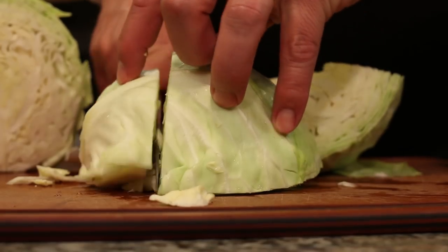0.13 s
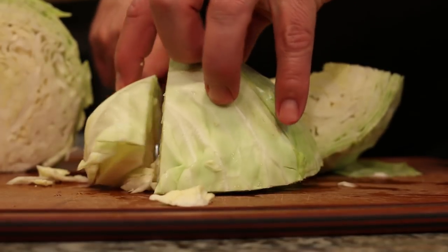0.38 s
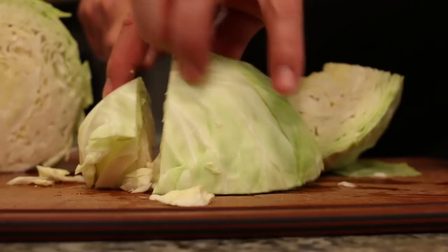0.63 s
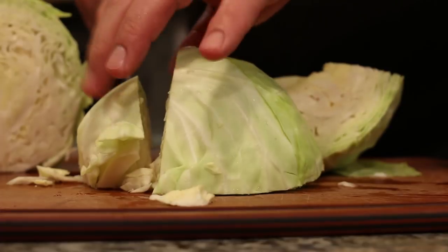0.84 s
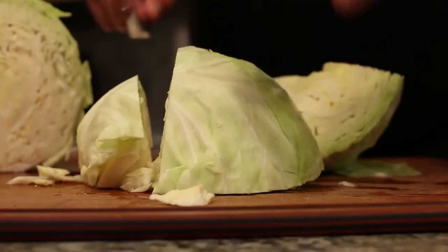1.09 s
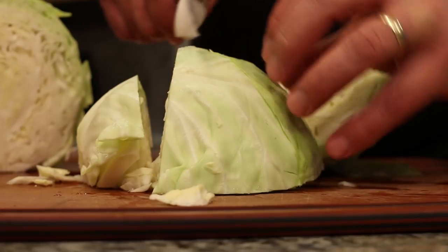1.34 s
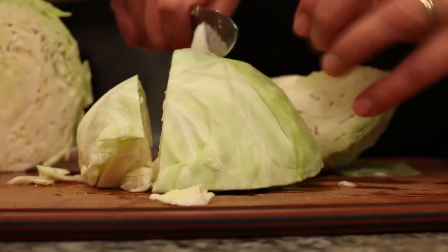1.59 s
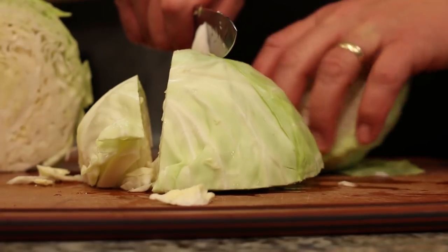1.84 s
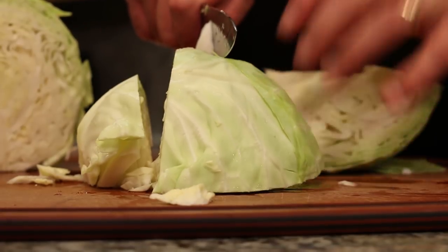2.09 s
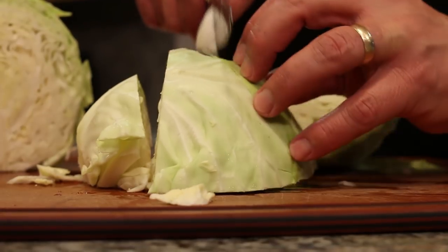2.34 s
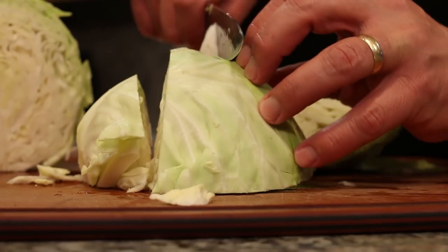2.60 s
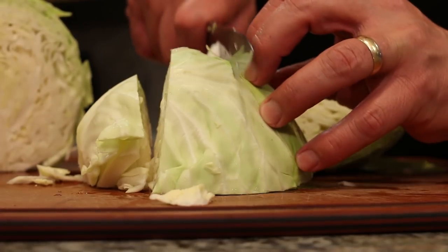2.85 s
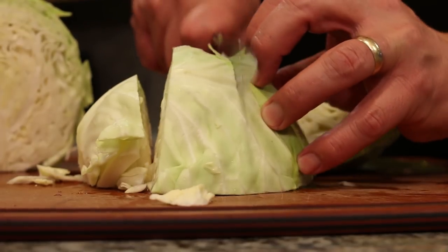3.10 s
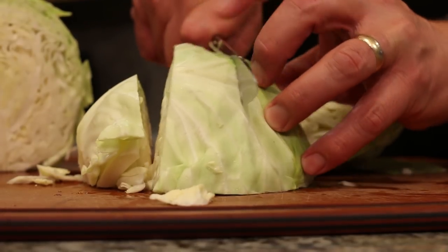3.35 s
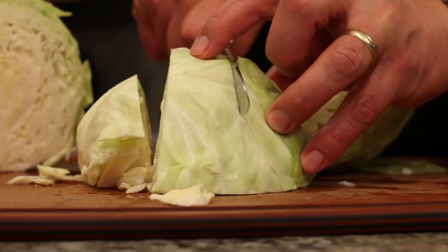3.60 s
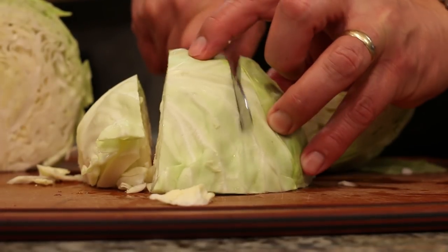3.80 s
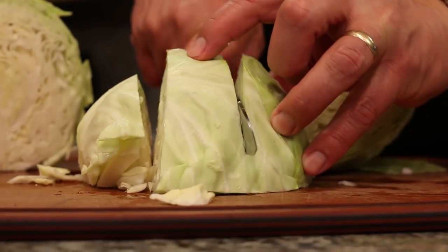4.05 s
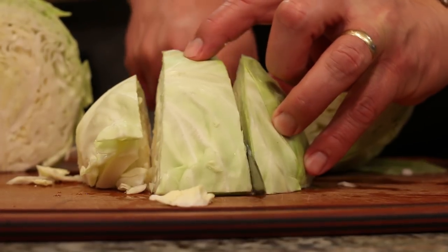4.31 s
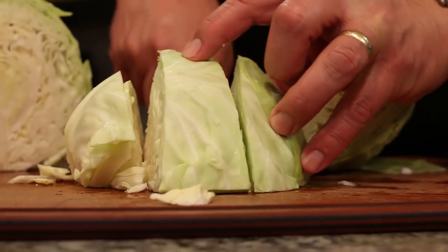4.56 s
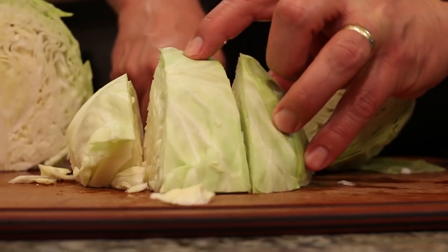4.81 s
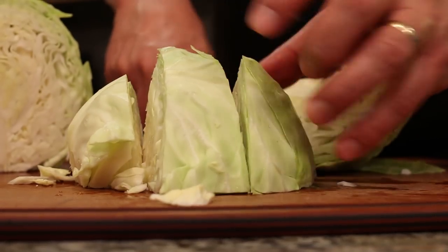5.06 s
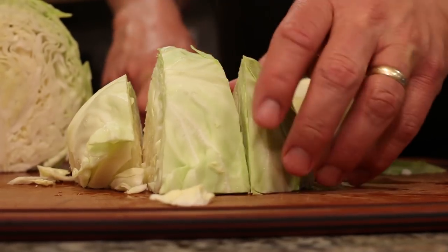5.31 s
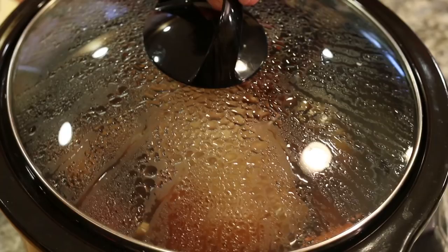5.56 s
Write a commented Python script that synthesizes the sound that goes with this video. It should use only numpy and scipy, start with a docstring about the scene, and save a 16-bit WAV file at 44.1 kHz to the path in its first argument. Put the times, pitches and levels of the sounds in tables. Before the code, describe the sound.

Close-up cabbage cutting: sparse ticks, crunchy tearing fibres, one hard woody blade knock, small snaps, a brief scrape and a soft wedge thud.

```python
"""Knife through a raw cabbage on a wooden board, close by: shaped noise grains crackle as fibres part,
band-passed ticks and short modes are ribs snapping and knocks of the handling hand; board modes ring
under the blade, then a wedge drops. The blade edge drags once along the board.
Sparse decaying echoes make the kitchen; wavering sine lines are refrigerator hum,
coloured noise is air and microphone hiss."""
import sys
import numpy as np
from scipy import signal
from scipy.fft import rfft, irfft
from scipy.io import wavfile
from scipy.ndimage import uniform_filter1d

SR = 44100
rng = np.random.default_rng(int(sys.argv[2]) if len(sys.argv) > 2 else 0)


def wrap_up_sound(samples):
    """Save the sound to the file named by the first command line argument, as 16-bit audio."""
    columns = np.atleast_2d(samples).T
    # keep every value between -1 and 1, then stretch to whole-number steps
    tamed = np.clip(columns, -1, 1)
    steps = np.round(tamed * 32767).astype(np.int16)
    wavfile.write(sys.argv[1], SR, steps)


def ratio(d):
    """dB to gain"""
    e = np.asarray(d, float) / 20
    return 10 ** e


N = 250311
LEAD_S = 1  # run-in, so that sounds begun before t = 0 still ring

# Blade on board: t/s, board ring peak/dB, last ribs' crack/dB, contact brightness/(dB/octave)
CHOPS = [(-.03, -17, -12.5, 1.5), (4.3109, -0.3, -10, 0.0)]
# Board modes: f/Hz, relative level/dB, decay scale/s (see ring)
BOARD_MODES = [(330, -19, .04), (630, -26, .03), (820, -3, 0.022), (1140, -4.5, 0.015), (1480, -15, 0.018),
               (1790, -3, 0.013), (1905, 0.5, 0.014), (2080, -3, .013), (2322, -2.5, 0.013),
               (2670, -6, 0.018), (3130, -21, 0.04), (4140, -16.5, 0.016), (4315, -23.5, 0.023),
               (4960, -13, 0.013), (5400, -19, 0.023), (6400, -20, 0.0054), (7110, -17, 0.0075)]
# Modes of the counter under the board: f/Hz, relative level/dB, decay scale/s
WORKTOP_MODES = [(45, 2, 0.07), (85, -7, 0.082)]
# Spectrum of the last ribs cracking: f/Hz, relative density/dB
CRACK_SPECTRUM = [(88, -46), (150, -27), (404, -14), (695, -9), (812, -7), (1550, -5), (2300, -1.5),
                  (3500, -15), (4800, -11), (7500, -24), (15500, -44)]

# Echoes of the kitchen: f/Hz, t60/s, relative level reaching the walls/dB
KITCHEN = [(250, 0.61, 0), (450, .45, 0), (806, 0.4, -5), (1100, .45, -5), (1450, 0.45, -10),
           (1850, .5, -3), (2500, 0.48, -1), (3660, 0.59, -4.5), (5160, 0.45, -1), (7200, 0.21, -2),
           (12000, 0.23, 5)]
# Air and microphone noise: f/Hz, relative density/dB
AIR_SPECTRUM = [(20, -17.5), (90, -11.5), (180, -7), (385, -12.5), (540, -12.5), (860, -16.5), (1200, -21),
                (2100, -22.5), (3000, -27), (6000, -30), (12000, -27.5), (15700, -30.5)]
AIR_DB, DRIFT_DB, DRIFT_S = -53, 0.7, 0.15  # level, rms level wander, its smoothing window
# Motor hum lines: f/Hz, rms level/dB, line width/Hz
HUM = [(60, -77, 2.3), (121, -61.5, 3.3), (223.5, -68.5, 10.6), (387.3, -65, 10.6), (1165, -70, 11.8)]
# Capsule hiss, opposite in the two channels: f/Hz, relative density/dB
SIDE_HISS_SPECTRUM = [(12, -30), (20, -6), (187, -10.5), (241, -10.5), (388, -12), (558, -11), (897, -15.5),
                      (16000, -13.5)]
SIDE_HISS_DB = -61

# Pushes of blade or hand: t/s, build-up/s, let-go/s, fibre crackle/dB, body squeeze/dB
PUSHES = [ (0.0, .003, .12, -70, -52), (0.05, .02, .22, -64, -55), (0.6, 0.016, 0.15, -62.5, -60),
          (1.803, 0.0088, 0.04, -54, -54), (2.765, 0.056, .11, -48, -61.5),
          (2.92, 0.023, 0.074, -54.5, -49.5), (3.02, 0.014, 0.039, -51, -57),
          (3.134, 0.04, .11, -48, -49.5), (3.25, .06, .1, -56, -59), (3.38, .06, .2, -55, -60),
          (3.625, 0.034, .1, -54, -61), (3.825, .025, 0.1, -47.5, -52), (4.015, .03, .12, -51, -50),
          (4.169, .04, 0.027, -56.5, -51.5), (4.235, 0.022, 0.033, -46, -47),
          (4.274, .03, 0.0052, -38, -42), (4.312, .01, .16, -49, -52), (4.47, .03, 0.094, -45, -53),
          (4.635, 0.04, 0.03, -48, -52), (4.685, .018, .014, -41, -52), (4.78, 0.073, .08, -55.5, -61)]
BUILD_DB, LET_GO_DB = 9.5, 8.5  # swell to the peak, fade before the stop
JERK_DB, JERK_S = 2.8, 0.0086  # uneven advance: rms, smoothing window
# Density of the cabbage touched: t/s, share (loose leaves 0, heart 1)
DENSITY = [(1.9, 0.8), (2.76, 0.045), (3.3, 0.4), (3.85, 0.84), (4.6, 0.96), (4.68, 0.45)]
# Loose outer leaves: f/Hz, relative density/dB
LEAF_SPECTRUM = [(1500, -42), (2500, -27), (3500, -21), (5000, -10), (8000, -1.5), (11200, 2.5),
                 (13500, -8), (15700, -13)]
# Dense wet heart: f/Hz, relative density/dB
HEART_SPECTRUM = [(1500, -26), (2500, -7.5), (3500, -15), (4800, -5.5), (7500, -12), (10800, -2.5),
                  (15700, -9.5)]
# Squeezed cabbage body: f/Hz, relative density/dB
BODY_SPECTRUM = [(180, -36), (300, -11), (362, -2.5), (636, -16), (778, 0.5), (1150, 0), (1470, -0.5),
                 (1780, -2), (6000, -12), (7800, -29), (13200, -120)]

# Ribs snapping and knocks of the handling hand: t/s, tick peak/dB, knock peak/dB, tick f/Hz
SNAPS = [(0.0658, -37.5, -54, 7400), (0.1148, -43, -48, 6800), (0.204, -42, -58, 5500),
         (0.254, -46, -58, 6000), (0.6244, -40, -48, 6460), (0.6808, -41, -52, 7200),
         (0.6954, -40, -56, 8000), (0.7178, -42, -56, 9600), (0.944, -37, -37, 8600),
         (1.2624, -34, -48, 7800), (1.7685, -43, -56, 6000), (1.7725, -37, -46, 9000),
         (1.8124, -32.5, -33, 8000), (1.8155, -35, -40, 12500), (1.8235, -40, -50, 12500),
         (1.842, -39, -48, 8500), (1.857, -50, -44, 6000), (1.886, -43, -58, 10500),
         (1.8932, -42, -37, 7600), (2.187, -48, -43, 7000), (2.237, -50, -44, 7000), (2.28, -43, -48, 7500),
         (2.345, -44, -58, 10500), (2.354, -41, -52, 12000), (2.7199, -33, -62, 10900),
         (2.773, -28, -62, 11200), (2.78, -36, -60, 11000), (2.7955, -33, -56, 11000),
         (2.799, -24.5, -46, 11200), (2.8243, -29, -41, 9700), (2.8278, -30, -48, 11000),
         (2.8435, -32, -46, 8500), (2.8645, -34, -44, 10300), (2.8857, -29, -44, 10100),
         (2.9003, -28, -39, 10200), (2.9451, -34, -40, 7800), (2.963, -33, -45, 8800),
         (2.9758, -33, -37.5, 8600), (3.008, -38, -52, 8000), (3.0185, -40, -56, 12500),
         (3.0343, -33, -46, 9000), (3.057, -40, -54, 9500), (3.12, -42, -60, 11000),
         (3.1436, -27, -55, 9900), (3.1476, -27, -43, 9600), (3.1728, -18.5, -26.5, 9800),
         (3.1977, -27, -36, 10700), (3.2147, -46, -35, 8700), (3.226, -34, -44, 7000),
         (3.2371, -33, -42, 8200), (3.2778, -39, -54, 9700), (3.308, -40, -56, 11000),
         (3.323, -39, -58, 10700), (3.3312, -34, -53, 11500), (3.3478, -34.5, -52, 9000),
         (3.4345, -38, -46, 8400), (3.488, -40, -56, 10000), (3.551, -34, -41, 10700),
         (3.6012, -39, -40, 10000), (3.6576, -32.5, -50, 11000), (3.669, -33, -46, 11500),
         (3.695, -39, -56, 11000), (3.7186, -36, -57, 12400), (3.748, -39, -56, 10500),
         (3.759, -41, -54, 8000), (3.8425, -34, -44.5, 10200), (3.8773, -36, -40, 11100),
         (3.9263, -35, -34, 7800), (3.9364, -34, -49, 8100), (4.036, -30, -46, 12600),
         (4.1423, -46, -37.5, 6000), (4.2117, -40, -32, 6200), (4.237, -39, -43, 6900),
         (4.2951, -27, -28, 6400), (4.4787, -35, -47, 9900), (4.5332, -28.5, -29, 6500),
         (4.5754, -32, -34.5, 9100), (4.6608, -32, -38, 8800), (4.6788, -28, -31.5, 12000),
         (4.696, -22, -48, 11200), (4.703, -25.5, -36, 12300), (4.7081, -30, -33.5, 12000),
         (4.872, -42, -50, 10600)]
# Modes of the cabbage head: f/Hz, relative level/dB, decay scale/s
HEAD_MODES = [(450, -13, 0.023), (710, -1, 0.025), (1140, -2.5, 0.021), (2030, 0, 0.0084),
              (3220, 0, 0.0063)]
SMALL_PER_S, SMALL_HZ = 52, 10500  # smaller ribs: rate, mean tick pitch
SMALL_DB, SMALL_SPREAD_DB = 6.5, 2.5  # mean tick level over the crackle gain, spread
SMALL_KNOCK_DB = -15  # mean knock level relative to the tick

# Edge drawn along the board: t/s, build-up/s, let-go/s, level/dB
DRAG = (4.78, .05, .11, -51.5)
# Wedge falling: t/s, thud peak/dB, board ring peak/dB, wet leaf slap/dB
WEDGE_DROP = (5.6588, -18, -21, -33)
# Wedge modes: f/Hz, relative level/dB, decay scale/s
WEDGE_MODES = [(225, 0, 0.052), (290, 1, 0.045), (468, -6, 0.04), (610, -14, .03), (760, -10, .04)]
EDGE_HZ = 15900  # upper band limit


def evened(x):
    """Scales to rms 1."""
    return x / np.sqrt(np.mean(x ** 2) + 1e-20)


def coloured(x, spectrum):
    """Shapes x by a (Hz, dB) table, interpolated over log frequency, to rms 1."""
    f_hz, db = np.transpose(spectrum)
    hz = np.fft.rfftfreq(len(x), 1 / SR)
    gain = ratio(np.interp(np.log(hz + 1), np.log(f_hz + 1), db))
    return evened(irfft(rfft(x) * gain, len(x)))


def tilted(rows, slope_db):
    """Tilts a (Hz, dB, ..) table by slope_db per octave about 1 kHz."""
    return [(row[0], row[1] + slope_db * np.log2(row[0] / 1000), *row[2:]) for row in rows]


def wavering(rms_db, window_s):
    """Gain wandering as twice-smoothed noise."""
    width = round(window_s * SR)
    slow = uniform_filter1d(uniform_filter1d(rng.standard_normal(N), width), width)
    return ratio(rms_db * evened(slow))


def add(mix, s, sound):
    """Mixes sound in at s seconds, which may be negative."""
    at = round(s * SR)
    sound = sound[max(-at, 0):]
    part = mix[..., max(at, 0):][..., :sound.shape[-1]]
    part += sound[:part.shape[-1]]


def ring(modes, contact_s, detune=1, damping=0.73, low_hz=150):
    """Modes losing 60 * damping dB per decay scale, short contact onset, little bass; peak 1."""
    t = np.arange(SR // 10) / SR
    x = np.zeros(len(t))
    for hz, db, decay_s in modes:
        x += ratio(db - 60 * damping * t / decay_s) * np.sin(2 * np.pi * hz * detune * t)
    b, a = signal.butter(2, low_hz, "high", fs=SR)
    x = signal.lfilter(b, a, x * (1 - np.exp(-t / contact_s)))
    return x / abs(x).max()


def puff(spectrum, decay_s):
    """Coloured noise burst with exponential decay."""
    t = np.arange(SR // 10) / SR
    return coloured(rng.standard_normal(len(t)), spectrum) * np.exp(-t / decay_s)


def grains(per_s, spread_db, fill):
    """Sparse clicks, a few large, fraying into noise over a continuous rustle."""
    hit, size = rng.random(N), rng.exponential(1, N)
    fray, rustle = rng.standard_normal(N), rng.standard_normal(N)
    clicks = (hit < per_s / SR) * ratio(spread_db * np.minimum(size, 4))
    envelope = signal.lfilter([1], [1, -0.96], clicks)
    return evened(envelope * fray) + fill * rustle


def stroke(rise_s, fall_s):
    """Gain of one movement: swells to its peak, fades, stops; ends ramped."""
    t = np.arange(0, rise_s + fall_s, 1 / SR)
    db = np.interp(t, [0, rise_s, rise_s + fall_s], [-BUILD_DB, 0, -LET_GO_DB])
    ends = np.clip(np.minimum(t, rise_s + fall_s - t) / 0.0028, 0, 1)
    return ends * ratio(db)


def density(t):
    """Density of the cabbage touched: loose leaves 0, heart 1."""
    s, share = np.transpose(DENSITY)
    return np.clip(np.interp(t, s, share), 0, 1)


def effort():
    """Gains of fibre crackle and body squeeze over time."""
    fibre, body = np.zeros(N), np.zeros(N)
    for s, rise_s, fall_s, fibre_db, body_db in PUSHES:
        movement = stroke(rise_s, fall_s)
        add(fibre, s, ratio(fibre_db) * movement)
        add(body, s, ratio(body_db) * movement)
    return fibre, body


def chops():
    """Blade impact excites board and counter modes; the last ribs crack as a noise burst."""
    out = np.zeros(N + LEAD_S * SR)
    for s, board_db, crack_db, slope_db in CHOPS:
        at_s = s + LEAD_S
        add(out, at_s, -ratio(board_db) * ring(tilted(BOARD_MODES, slope_db), 0.00024, low_hz=600))
        add(out, at_s, ratio(board_db - 48) * ring(WORKTOP_MODES, 0.0026, low_hz=22.1))
        add(out, at_s, ratio(crack_db) * puff(tilted(CRACK_SPECTRUM, slope_db), 0.0032))
    return out


def kitchen(x):
    """Sparse random-sign echoes, each band dying at its own rate."""
    taps = np.zeros(SR)
    at = np.arange(400, SR - 20, 20)
    taps[at + rng.integers(0, 20, len(at))] = rng.choice([-1., 1.], len(at))
    hz, t, z = signal.stft(taps, SR, nperseg=256)
    f_hz, t60_s, db = np.transpose(KITCHEN)
    start_db = np.interp(hz, f_hz, db)[:, None]
    fall_db = 60 * t / np.interp(hz, f_hz, t60_s)[:, None]
    tail = signal.istft(z * ratio(start_db - fall_db), SR, nperseg=256)[1]
    return signal.fftconvolve(x, tail / np.linalg.norm(tail))[:len(x)]


def room_tone():
    """Level-drifting air and microphone noise; motor hum lines broadened by phase random walk."""
    t = np.arange(N) / SR
    out = ratio(AIR_DB) * coloured(rng.standard_normal(N), AIR_SPECTRUM)
    out *= wavering(DRIFT_DB, DRIFT_S)
    for hz, db, width_hz in HUM:
        wander = np.cumsum(rng.standard_normal(N)) * np.sqrt(2 * np.pi * abs(width_hz) / SR)
        out += ratio(db) * np.sqrt(2) * np.sin(2 * np.pi * hz * t + wander)
    return out


def capsule_hiss():
    """Coloured noise for the side signal."""
    return ratio(SIDE_HISS_DB) * coloured(rng.standard_normal(N), SIDE_HISS_SPECTRUM)


def crunch():
    """Many fibres part and the head is squeezed during each push; density sets the colour."""
    fibre, body = effort()
    jerks = wavering(JERK_DB, JERK_S)
    heart = density(np.arange(N) / SR)
    leaf = 1 - heart
    parting = grains(per_s=1100, spread_db=3.0, fill=0.7)
    crackle = leaf * coloured(parting, LEAF_SPECTRUM) + heart * coloured(parting, HEART_SPECTRUM)
    soft_body = coloured(parting, tilted(BODY_SPECTRUM, slope_db=-1.0))
    squeeze = leaf * soft_body + heart * coloured(parting, BODY_SPECTRUM)
    return jerks * (fibre * crackle + body * squeeze)


def small_snaps():
    """Smaller ribs: rows like SNAPS at random times, levels following the crackle gain."""
    when, size, dull, pitch = rng.random((300, 4)).T
    s = np.cumsum(-np.log(1 - when)) / SMALL_PER_S
    gain = np.interp(s, np.arange(N) / SR, effort()[0], right=0)
    spread_db = -SMALL_SPREAD_DB * (1 + np.log(1 - size))
    tick_db = 20 * np.log10(gain + 1e-9) + SMALL_DB + spread_db
    knock_db = tick_db + 2 * SMALL_KNOCK_DB * dull
    return list(np.transpose([s, tick_db, knock_db, SMALL_HZ * (0.75 + 0.5 * pitch)]))


def snaps():
    """Each snap or hand knock: a ragged band-passed noise tick and a dull knock of the head's modes."""
    out, t = np.zeros(N), np.arange(400) / SR
    decay = np.exp(-t / 0.00035) + 0.22 * np.exp(-t / 0.0025)
    for s, tick_db, knock_db, hz in SNAPS + small_snaps():
        if tick_db < -90:  # no push at this moment
            continue
        band = signal.butter(2, [0.76 * hz, min(1.3 * hz, 0.45 * SR)], "band", fs=SR)
        tick = signal.lfilter(*band, rng.standard_normal(400) * decay)
        add(out, s, ratio(tick_db) * tick / abs(tick).max())
        sign, detune = rng.choice([-1, 1]), 1 + 0.095 * rng.standard_normal()
        modes = tilted(HEAD_MODES, 8.3 * density(s) - 3.5)  # brighter in the heart
        add(out, s, ratio(knock_db) * sign * ring(modes, 0.00014, detune))
    return out


def drag():
    """Edge friction, as grains, sets the upper board modes humming."""
    s, rise_s, fall_s, db = DRAG
    gain, rub = np.zeros(N), grains(per_s=240, spread_db=3.0, fill=1.4)
    add(gain, s, ratio(db) * stroke(rise_s, fall_s))
    board = ring(BOARD_MODES, 0.00027, damping=2.2, low_hz=2000)
    return gain * evened(signal.fftconvolve(rub, board)[:N])


def wedge_drop():
    """A cut wedge hits the board: longer, softer contact, wedge and board modes, wet slap."""
    out = np.zeros(N + LEAD_S * SR)
    s, thud_db, board_db, slap_db = WEDGE_DROP
    at_s = s + LEAD_S
    board = ring(tilted(BOARD_MODES, slope_db=1.0), 0.0006, damping=0.4, low_hz=2200)
    add(out, at_s, -ratio(thud_db) * ring(WEDGE_MODES, 0.0025, low_hz=150))
    add(out, at_s, ratio(board_db) * board)
    add(out, at_s, ratio(slap_db) * puff(BODY_SPECTRUM, 0.023))
    return out


def scene():
    """All sources central; only capsule hiss and a trace of room differ left to right."""
    lead = LEAD_S * SR
    sources = chops() + wedge_drop()
    sources[lead:] += crunch() + snaps() + drag()
    mid = (sources + ratio(-9.5) * kitchen(sources))[lead:] + room_tone()
    side = capsule_hiss() + ratio(-69.5) * kitchen(sources)[lead:]
    return np.array([mid + side, mid - side])


def roll_off(x):
    """The treble ends steeply here."""
    return signal.sosfilt(signal.butter(12, 16410, fs=SR, output="sos"), x)


def record(dry):
    """Linear-phase low-pass at EDGE_HZ on the finished mix."""
    low_pass = signal.firwin(255, EDGE_HZ, window=("kaiser", 8), fs=SR)
    limited = signal.oaconvolve(dry, low_pass[None], "same")
    return roll_off(limited)


dry = scene()
out = record(dry)
wrap_up_sound(out)
```